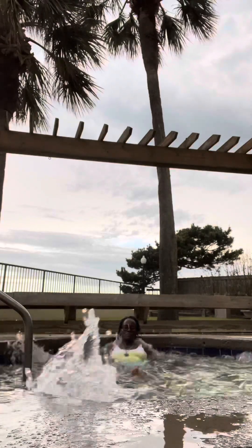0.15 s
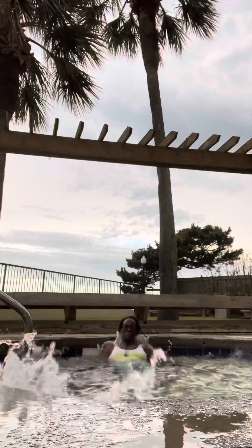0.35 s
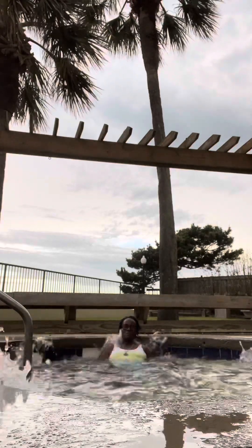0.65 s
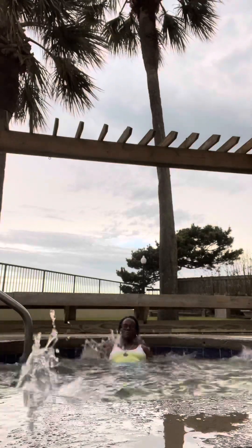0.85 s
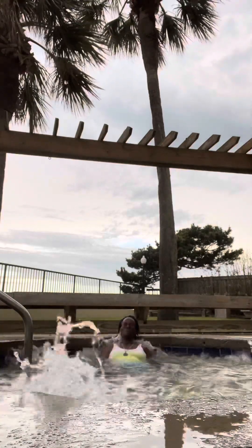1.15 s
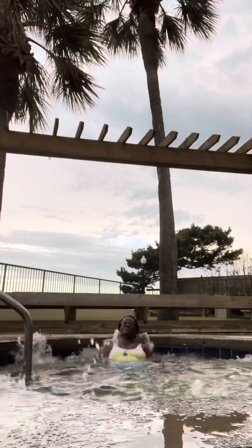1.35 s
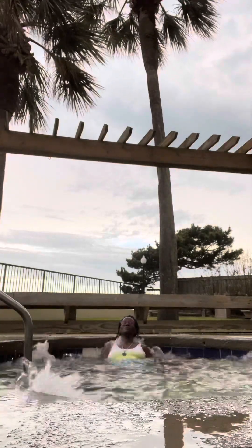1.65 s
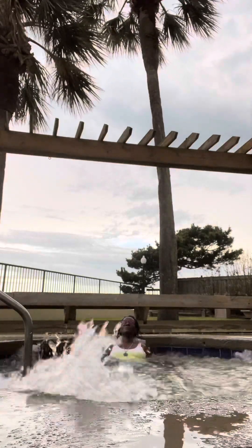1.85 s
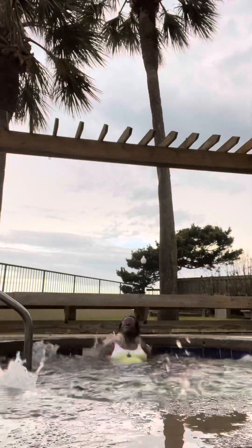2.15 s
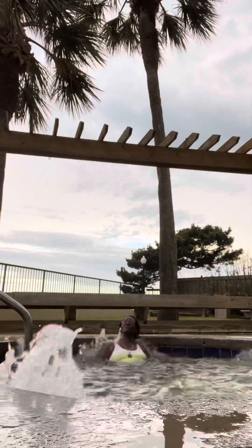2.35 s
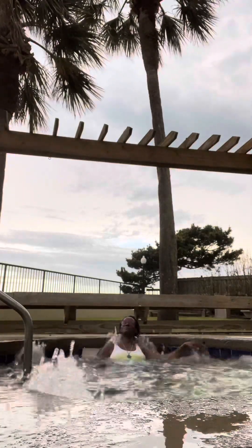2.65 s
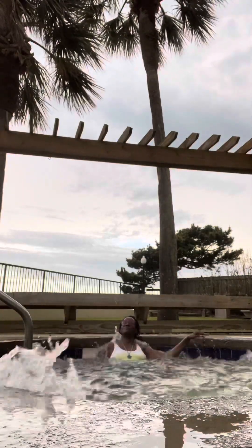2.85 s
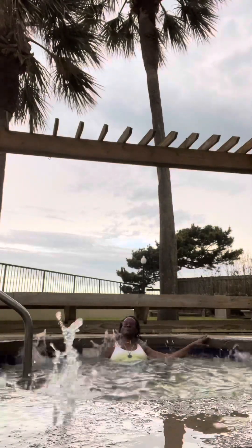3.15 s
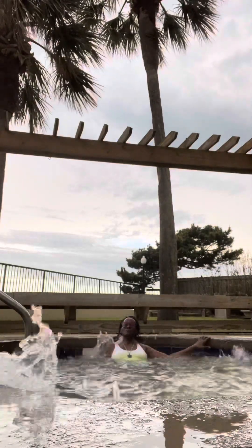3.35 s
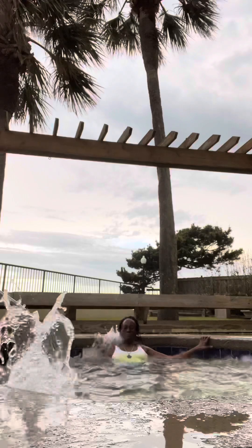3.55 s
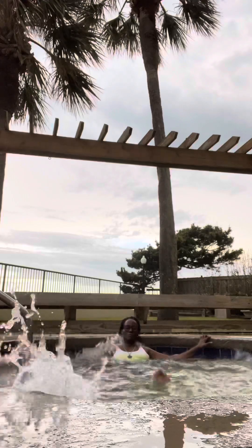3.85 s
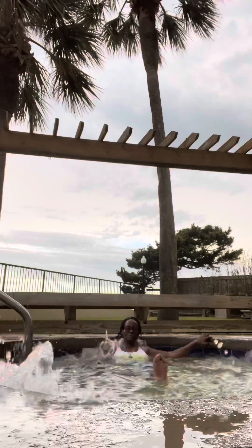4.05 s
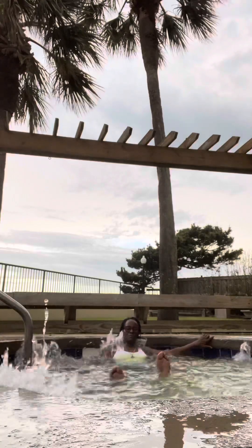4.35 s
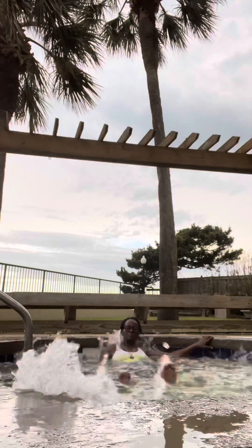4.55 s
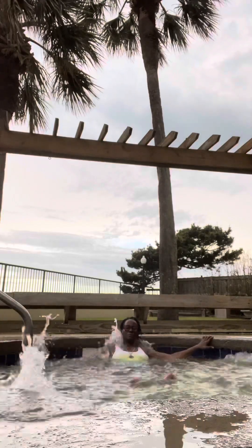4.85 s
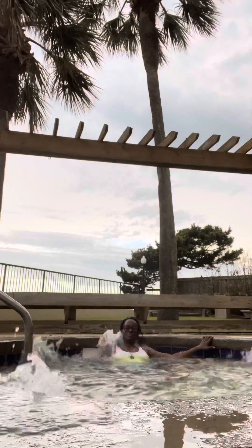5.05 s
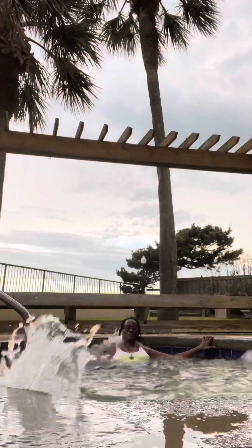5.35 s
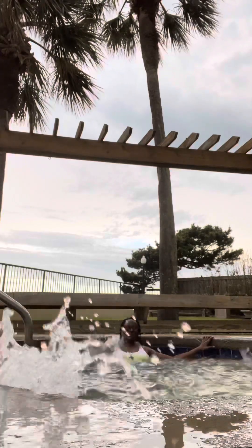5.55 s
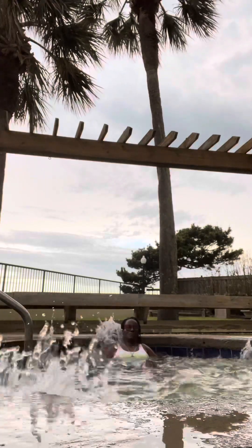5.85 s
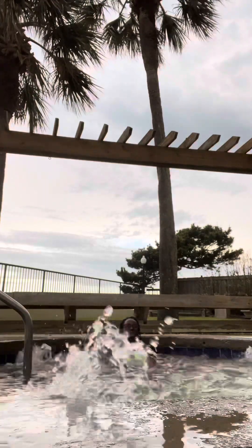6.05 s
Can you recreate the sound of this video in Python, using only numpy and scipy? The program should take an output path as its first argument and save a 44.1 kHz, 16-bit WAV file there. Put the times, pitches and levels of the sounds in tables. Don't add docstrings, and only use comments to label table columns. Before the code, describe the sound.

Hot tub jets churn and splash close by outdoors, with gurgling air pockets, bubbling froth, ticking drops and wind thumping softly on the microphone.

```python
import sys
import numpy as np
from scipy import signal
from scipy.io import wavfile
from scipy.ndimage import uniform_filter1d

SR = 44100
rng = np.random.default_rng(int(sys.argv[2]) if len(sys.argv) > 2 else 0)


def makeup_ratio(level_db):
    decades = np.asarray(level_db, float) / 20
    return 10 ** decades


def unload_wav(signal):
    wavfile.write(
        sys.argv[1],
        SR,
        np.round(np.clip(np.atleast_2d(signal).T, -1, 1) * 32767).astype(np.int16),
    )


N = 272979
FRAME, HOP = 1024, 256
WIND_HZ, SPRAY_HZ = 120, 950

# t/s, level/dB
JET_EFFORT = [
    (0.0, -29.5),
    (0.6, -31),
    (1.2, -28),
    (2.0, -25.5),
    (2.7, -22),
    (3.2, -24),
    (4.2, -26),
    (5.2, -24.5),
    (5.9, -26.5),
    (6.19, -23),
]
# t/s, lift/dB
HEAVES = [(0.2, 6), (0.4, 3.5), (0.62, 1), (1.0, -0.5), (1.42, 7.5), (1.82, 10.5), (2.1, 2.5), (2.3, 3),
          (2.5, 6.5), (2.78, 2.5), (3.1, 0), (3.4, 2.5), (3.6, 7.5), (3.8, 5.5), (4.13, 1.5), (4.4, 9),
          (4.66, 5.5), (5.0, 3), (5.3, 2.5), (5.7, 3.5), (6.0, 0)]
# t/s, lift/dB
SHEETS = [(0.0, 1.5), (0.2, 1.5), (0.5, 2), (0.78, 2), (1.08, 2.5), (1.42, 2), (2.12, 3.5), (2.52, 2.5),
          (2.8, 0.5), (3.05, 1.5), (3.87, 2.5), (4.2, 1.5), (4.68, 3.5), (4.92, 1), (5.2, 1.5), (5.4, 1),
          (5.7, 4.5), (6.0, 2.5)]
# t/s, half length/s, depth/dB (negative lifts), centre f/Hz
LULLS = [(0.408, 0.026, 6, 930), (0.831, 0.014, 14, 850), (0.848, 0.03, 5, 400), (0.94, 0.022, 16, 600),
         (1.045, 0.038, 9, 696), (1.224, 0.02, 14, 810), (3.66, 0.07, 8, 250), (5.46, 0.047, 16, 230),
         (2.45, 0.14, 11, 50), (2.98, 0.052, 22, 66), (3.993, .025, 7, 730), (4.538, 0.033, 16, 60),
         (5.866, 0.038, 19, 120), (0.68, .03, 2, 150), (0.885, 0.021, 4, 950), (1.02, 0.038, 2, 240),
         (1.155, 0.04, 0.5, 580), (1.34, 0.03, 4, 230), (1.817, 0.037, 12, 200), (2.2, 0.094, 3, 460),
         (2.306, 0.027, 2.5, 950), (3.54, 0.028, 17, 114), (3.895, .025, 2, 312), (4.39, 0.018, 9, 200),
         (5.948, .04, 6, 50), (6.16, 0.066, 6, 370), (5.406, 0.02, -2, 400), (5.698, .03, 4, 1700),
         (5.77, 0.018, 6, 70), (3.0, .03, 6, 45), (3.595, 0.036, 1.5, 430), (0.75, .02, 6, 120),
         (5.4, .012, 6, 380), (5.528, .012, 6, 420), (3.665, 0.11, 3.5, 630), (4.66, .04, 3, 210),
         (3.045, .02, 1.5, 680), (0.14, 0.025, -2, 390), (1.69, 0.051, 8, 170), (5.2, .03, 3, 330),
         (1.136, .03, 2, 630)]
# t/s, half length/s, depth/dB
THINNINGS = [(0.05, .08, 2), (0.55, 0.092, 4), (0.85, .1, 3), (1.06, 0.078, 3), (6, 0.13, 3), (6.3, .22, 7),
             (0.22, .04, 6), (0.34, .02, 4), (5.6, .05, 4), (4.3, 0.028, 10), (2.4, .04, 2), (1.48, .04, 4)]
# f/Hz, density/dB per Hz
SUM_SPECTRUM = [(18, -41), (30, -13.5), (65, -3.5), (189, -4.5), (335, -3), (500, -8), (552, -6),
                (674, -11), (1570, -18.5), (2460, -24.5), (4140, -28.5), (4810, -30), (7920, -32.5),
                (11500, -41.5), (15000, -90), (22000, -120)]
# f/Hz, density/dB per Hz
DIFF_SPECTRUM = [(60, -13), (100, -4), (200, -21), (500, -6), (960, -1), (2400, -8), (3000, -9),
                 (4000, -14), (4600, -10.5), (5700, -15), (6500, -20), (7500, -16.5), (13000, -15.5),
                 (15300, -17)]
# f/Hz, density/dB per Hz
WIDE_SPECTRUM = [(24, -49), (40, -18), (131, 1), (350, 3.5), (595, -6.5), (758, -15), (1500, -34),
                 (1950, -59), (3300, -120)]
# f/Hz, share in phase/1, share a quarter turn late/1
PORT_LINK = [(300, -0.02, 0.51), (1340, -0.4, -0.28), (1900, -0.077, 0), (2500, 0.057, -.4),
             (3100, 0.051, 0), (3900, 0.089, .65), (4500, 0.23, .5), (5000, 0.31, -.2), (5800, .1, 0),
             (6900, -0.0075, .6), (11500, 0, .65)]
# f/Hz, half width/Hz, level/dB
PORT_RESONANCE = (4190, 320, 3.8)
# f/Hz, level/dB
WALL_SHADE = (1780, -1.47)
# t/s, level/dB
GUARD_WIDTH = [(0.0, -25), (0.4, -23), (1.0, -19), (1.4, -21), (1.5, -34), (1.9, -40), (2.0, -46),
               (3.0, -48), (3.2, -23), (3.3, -44), (3.7, -28), (3.8, -33), (3.9, -20.5), (4.6, -26),
               (4.75, -37), (5.1, -33), (5.2, -29), (6.19, -24)]
# t/s, peak level/dB, f/Hz, length/s
GULPS = [(0.241, -10, 207, 0.082), (0.704, -9, 319, 0.048), (3.661, -14, 270, 0.046),
         (1.06, -10.5, 320, 0.042), (1.263, -6, 333, 0.025), (1.498, -7, 377, 0.03),
         (1.734, -7, 300, 0.039), (1.867, -6, 300, 0.047), (2.0, -12, 218, 0.018),
         (2.025, -6.5, 296, 0.055), (2.169, -12, 313, 0.057), (2.473, -6.5, 300, 0.037),
         (2.976, -8, 214, 0.035), (3.043, -7, 242, 0.062), (3.098, -3, 389, 0.036), (3.117, -13, 352, .025),
         (3.845, -5, 280, 0.017), (3.435, -12, 190, .02), (4.091, -8, 278, 0.038), (2.93, -9, 178, 0.046),
         (2.792, -6.5, 200, .03), (2.09, -9.5, 318, 0.026), (5.67, -10, 300, 0.024), (5.726, -10, 352, .02),
         (5.79, -15, 394, 0.045), (0.902, -9.5, 336, 0.025), (1.113, -11, 327, .025),
         (3.148, -4.5, 178, 0.023), (3.217, -14, 152, 0.059), (3.286, -5.5, 219.6, 0.081),
         (3.413, 0.5, 264, 0.015), (3.483, -0.5, 250, 0.023), (3.614, -7.5, 255, 0.031),
         (3.76, -7, 172, 0.036), (3.819, 2, 152, 0.026), (4.553, -12, 450, 0.018),
         (4.811, -3.5, 371, 0.031), (4.985, -5.5, 345, 0.031), (5.191, -9, 184, 0.046),
         (5.295, -5.5, 270, 0.026), (5.326, -5, 432, 0.037), (5.65, -9, 468, 0.024),
         (5.711, -9, 277, 0.034)]
# t/s, peak level/dB, f/Hz
BURBLES = [(0.128, -21, 312), (0.175, -18, 195), (0.36, -15, 354), (0.544, -19, 231), (0.664, -22, 270),
           (0.976, -15, 290), (1.073, -15, 171), (1.407, -14, 345), (1.556, -17, 260), (1.81, -22, 315),
           (1.959, -31, 252), (2.245, -16, 159), (2.3, -16, 280), (2.33, -11.5, 180), (2.4, -20, 355),
           (2.605, -26, 213), (2.655, -11.5, 218), (2.688, -15, 300), (2.758, -30, 338), (3.33, -11, 290),
           (3.996, -20, 325), (4.124, -21, 320), (4.2, -17, 217), (4.3, -19, 184), (4.408, -22, 310),
           (4.439, -12, 265), (4.616, -14, 326), (4.674, -18, 180), (4.718, -14, 330), (4.754, -14, 380),
           (2.885, -9.5, 198), (2.78, -17, 250), (4.94, -28, 310), (5.031, -19, 164), (5.147, -24, 382),
           (5.224, -13, 260), (5.353, -17, 322), (5.536, -22, 285), (5.573, -13, 273), (6.034, -21, 346)]
# t/s, peak level/dB, f/Hz
PLOPS = [(0.434, -17, 550), (0.901, -12.5, 532), (0.963, -25, 580), (1.118, -10.5, 530), (1.262, -12, 635),
         (1.319, -15, 574), (1.842, -16, 467), (2.07, -6.5, 407), (2.484, -19, 448), (2.719, -22, 441),
         (3.035, -16, 570), (3.096, -14, 423), (3.416, -15, 585), (3.535, -13, 605), (3.928, -11.5, 452),
         (4.196, -6, 437), (4.254, -11, 560), (4.43, -7.5, 416), (4.554, -17, 433), (5.031, -13, 520),
         (5.26, -14, 426), (5.364, -10.5, 540), (5.652, -9.5, 482), (6.044, -11.5, 590)]
# t/s, peak level/dB, f/Hz
BLIPS = [(0.584, -12, 474), (1.081, -16, 460), (1.197, -15.5, 523), (1.414, -20, 447), (1.663, -14, 564),
         (2.881, -20, 530), (3.825, -12, 450), (4.06, -15, 558), (4.321, -20, 510), (4.635, -18, 522),
         (2.775, -15, 490), (0.6, -19, 627), (0.72, -15, 540), (0.13, -18.5, 598), (5.103, -20, 614),
         (5.19, -26, 435), (5.74, -21, 497), (6.076, -17.5, 540), (6.128, -15.5, 551)]
# t/s, peak level/dB, f/Hz
POPS = [(0.11, -20, 660), (0.443, -19, 810), (0.583, -18, 807), (0.859, -20, 1040), (1.364, -20, 840),
        (1.5, -27, 660), (1.609, -17, 770), (1.683, -18, 1040), (1.789, -19, 805), (2.046, -21, 1160),
        (2.416, -22, 872), (2.771, -17, 850), (2.804, -20, 1377), (2.893, -26, 732), (2.972, -26, 800),
        (3.285, -28, 727), (3.417, -18, 690), (3.487, -19, 915), (3.814, -21, 806), (3.928, -24, 678),
        (4.305, -23, 630), (4.429, -22, 781), (4.505, -18, 902), (4.642, -21, 773), (4.702, -18, 1140),
        (5.049, -26, 890), (5.207, -21, 670), (5.357, -16, 794), (5.56, -15, 700), (5.604, -24, 851),
        (5.643, -15, 899), (5.786, -15, 746), (5.896, -16, 970), (6.071, -19, 750)]
# t/s, peak level/dB, f/Hz, length/s
PLINKS = [(0.291, -25, 2550, 0.016), (0.73, -30, 3220, 0.011), (1.021, -18.5, 4330, 0.008),
          (1.331, -24, 4100, 0.014), (1.63, -22, 4500, 0.0091), (2.267, -26, 3040, 0.013),
          (2.464, -25, 3000, 0.014), (2.553, -16.5, 2250, 0.034), (2.802, -29, 2110, 0.014),
          (3.011, -24, 3300, 0.013), (3.231, -22, 3570, 0.014), (3.668, -22, 4220, 0.02),
          (3.737, -18, 3480, 0.019), (3.831, -18, 2200, 0.04), (5.453, -26, 4200, .015),
          (4.04, -29, 4070, .012), (4.155, -18, 3170, 0.015), (5.364, -21, 4020, 0.012),
          (5.881, -22, 2630, 0.014)]
# t/s, peak level/dB, ring f/Hz
DROPS = [(0.049, -24, 6120), (0.297, -15, 7000), (0.45, -19, 6100), (0.87, -19, 6810), (1.022, -21, 4400),
         (1.49, -18, 5800), (1.632, -23, 5460), (1.9949, -22, 6090), (2.177, -14.5, 6000),
         (2.2689, -16.5, 6150), (2.4244, -25, 6960), (2.4688, -21, 7030), (2.611, -21, 6140),
         (2.646, -15.5, 5500), (2.7072, -28, 5250), (3.2166, -22, 6320), (3.671, -20, 5310),
         (4.62, -15, 7100), (4.6254, -18, 6000), (5.3652, -22, 6450), (5.4415, -23, 7040),
         (5.463, -20, 7000), (6.1519, -31, 4860)]
# t/s, peak level/dB, length/s, lowest f/Hz, highest f/Hz
TOP_HISSES = [
    (0.288, -43, 0.02, 11300, 15700),
    (3.752, -36, 0.015, 15100, 15800),
    (4.618, -30, .004, 14000, 16800),
    (4.623, -36, .004, 11300, 14000),
    (5.44, -39, .027, 11000, 15700),
    (5.461, -35, .005, 14500, 15800),
    (2.66, -37, .015, 11500, 12200),
]
# t/s, peak level/dB, f/Hz, length/s
THUMPS = [(0.24, -11.5, 83, 0.028), (0.4, -23, 92, 0.082), (0.804, -10.5, 94, 0.044),
          (4.463, -18, 96, 0.027), (0.902, -19, 118, 0.035), (1.25, -11.5, 135, 0.02),
          (1.472, -25, 104, 0.041), (1.87, -24, 57, 0.047), (2.306, -16.5, 126, 0.084),
          (2.415, -16, 136, .04), (2.619, -14.5, 128, 0.065), (3.062, -20.5, 105, 0.13),
          (3.234, -12, 120, 0.041), (3.289, -16, 124, 0.051), (3.368, -4, 104, 0.021),
          (3.334, -15, 70, 0.055), (3.427, -13, 99, 0.079), (3.468, -11, 100, 0.047), (3.6, -13, 67, 0.058),
          (3.695, -10.5, 69.4, 0.044), (3.769, -13.5, 133, 0.052), (3.821, -3, 69, 0.061),
          (3.875, -7.5, 67, 0.052), (4.31, -17, 127, 0.034), (4.427, -13.5, 83, 0.043),
          (0.051, -23, 121, 0.039), (1.327, -28, 113, .03), (5.918, -17, 134, 0.033),
          (4.595, -16, 68, 0.077), (5.005, -19.5, 76.6, 0.066), (5.149, -21, 107, 0.22),
          (5.686, -15, 100, 0.037), (3.34, -12, 151, 0.028), (5.75, -15, 110, 0.018),
          (6.084, -19.5, 98, 0.035)]
# t/s, level/dB
WIND = [(0.0, -33.5), (1.12, -39), (1.31, -28.5), (1.6, -39.5), (2.45, -32.5), (2.83, -39), (3.09, -28),
        (3.26, -37), (3.45, -20.5), (3.85, -29), (4.05, -35), (4.55, -30), (4.74, -39.5), (5.1, -39),
        (5.38, -41), (5.81, -29), (6.02, -32.5), (6.19, -46)]


def evened(x):
    return x / np.sqrt(np.mean(np.abs(x) ** 2) + 1e-20)


def drift(size):
    return evened(uniform_filter1d(uniform_filter1d(rng.standard_normal(N), size), size))


def blotches(x, bins, frames):
    return evened(uniform_filter1d(uniform_filter1d(x, bins, axis=0), frames, axis=1))


def read(points, hz, axis=1):
    table = np.transpose(points)
    return np.interp(np.log(hz + 1), np.log(table[0] + 1), table[axis])[:, None]


def follow(points, t):
    return np.interp(t, *np.transpose(points))


def add(mix, s, sound):
    part = mix[max(round(s * SR), 0):][:len(sound)]
    part += sound[:len(part)]


def lowpass(x, order, hz):
    return signal.sosfilt(signal.butter(order, hz, fs=SR, output="sos"), x)


def spectra(x):
    return signal.stft(x, nperseg=FRAME, noverlap=FRAME - HOP)[2]


def heard(z):
    return signal.istft(z, nperseg=FRAME, noverlap=FRAME - HOP)[1][:N]


def water():
    hz = np.fft.rfftfreq(FRAME, 1 / SR)[:, None]
    low = 1 / (1 + (hz / WIND_HZ) ** 4)
    high = 1 / (1 + (SPRAY_HZ / (hz + 1)) ** 3)
    gain = landings()
    near, far = surface(gain, high), surface(gain, high)
    t = np.arange(near.shape[1]) * HOP / SR
    guard_db = follow(GUARD_WIDTH, t)
    unfolded = np.minimum(makeup_ratio(guard_db), 1.5)

    field = rng.standard_normal(near.shape)
    pockets = blotches(field[:, ::-1], 2, 9)
    patches_db = 0.75 * blotches(field, 8, 8)
    patches_db = patches_db * (1 + (2.2 * unfolded + 1.1) * (1 - high))

    motion_db, splash_db = surges(t, hz, low, high)
    colour_db = port_colour(hz, patches_db) - lulls(t, hz)
    colour_db = colour_db + (1.4 + 6.1 * unfolded / (1 + (hz / 1300) ** 4)) * (1 - low) * pockets
    thin_db = sum(db * np.exp(-((t - s) / half_s) ** 2) for s, half_s, db in THINNINGS)

    total = near * makeup_ratio(read(SUM_SPECTRUM, hz[:, 0]) + colour_db + motion_db + patches_db)
    total = total * makeup_ratio((-6.0 * unfolded - 1.3 * thin_db) / (1 + (10600 / (hz + 1)) ** 30))

    link = read(PORT_LINK, hz[:, 0]) - 1j * read(PORT_LINK, hz[:, 0], axis=2)
    echo = link * near + np.sqrt(1 - np.clip(abs(link) ** 2, 0, 1)) * far
    top_loss_db = 2.4 * thin_db * (1 + 0.6 * pockets) / (1 + (14500 / (hz + 1)) ** 16)
    folded_db = read(DIFF_SPECTRUM, hz[:, 0]) + 0.9 * high * splash_db + patches_db - top_loss_db
    folded = echo * makeup_ratio(folded_db)

    wide = evened(heard(echo * makeup_ratio(read(WIDE_SPECTRUM, hz[:, 0]) + 2.5 * patches_db)))
    flutter_db = 3 * drift(1800)
    wide = wide * makeup_ratio(-3 + flutter_db + follow(GUARD_WIDTH, np.arange(N) / SR))

    total = evened(heard(total * (hz < 11700)))
    folded = evened(heard(folded * (hz < 15720)))
    return makeup_ratio(-24) * total, makeup_ratio(-37) * folded + wide


def surges(t, hz, low, high):
    churn_db = follow(JET_EFFORT, t) + swells(t, HEAVES, half_s=0.081)
    splash_db = swells(t, SHEETS, half_s=0.11)
    churn_db = churn_db - churn_db.mean()
    splash_db = splash_db - splash_db.mean()
    slosh_db = -churn_db
    wind_db = follow(WIND, t) + 36
    body = (1 - low) / (1 + (hz / 600) ** 3)
    rest = 1 - low - body - high
    return low * wind_db + body * churn_db + rest * slosh_db + high * splash_db, splash_db


def swells(t, rows, half_s):
    return sum(db * np.exp(-((t - s) / half_s) ** 2) for s, db in rows)


def port_colour(hz, patches_db):
    port_hz, width_hz, port_db = PORT_RESONANCE
    shade_hz, shade_db = WALL_SHADE
    waver = 1 + 0.18 * evened(uniform_filter1d(patches_db.mean(0), size=6))
    port = port_db * np.exp(-((hz - port_hz) / width_hz) ** 4) * waver
    return port + shade_db / (1 + (shade_hz / (hz + 1)) ** 24) / (1 + (hz / 2700) ** 8)


def lulls(t, hz):
    return sum(db * np.exp(-((t - s) / half_s) ** 2 - (np.log((hz + 1) / centre_hz) / 0.5) ** 2)
               for s, half_s, db, centre_hz in LULLS)


def surface(gain, high):
    gurgle = spectra(froth(45.27, 2532, per_s=2200, spread_db=1.5, turns=8.78, rise=0.17, hiss=0.75))
    fizz = spectra(gain * froth(1210, 15670, per_s=5000, spread_db=3.5, turns=8.3, rise=0.15, hiss=0.81))
    gurgle, fizz = flattened(gurgle), flattened(fizz)
    return np.sqrt(1 - high) * gurgle + np.sqrt(high) * fizz


def flattened(z):
    return z / np.sqrt(uniform_filter1d((abs(z) ** 2).mean(1), size=3))[:, None]


def landings():
    sheets, clumps = drift(900), drift(250)
    return makeup_ratio(0.85 * sheets + 0.77 * np.maximum(clumps, 0) ** 1.48)


def froth(lo_hz, hi_hz, per_s, spread_db, turns, rise, hiss):
    sizes = makeup_ratio(spread_db * np.minimum(rng.exponential(1, N), 4.5)) * rng.choice([-1, 1], N)
    bursts = sizes * (rng.random(N) < per_s / SR)
    kind, out = rng.integers(0, 24, N), np.zeros(N)
    for k, hz in enumerate(np.geomspace(lo_hz, hi_hz, 24)):
        grain = bubble(hz, turns / hz, rise)
        grain = grain / np.linalg.norm(grain) * np.sqrt(hz)
        out += signal.oaconvolve(bursts * (kind == k), grain)[:N]
    return np.sqrt(hiss) * rng.standard_normal(N) + np.sqrt(1 - hiss) * evened(out)


def bubble(hz, length_s, rise, onset=0.22):
    u = np.linspace(0, 1, int(2 * length_s * SR) + 8)
    shape = (1 - np.exp(-u / (0.25 * onset))) * np.exp(-3.5 * u) * (1 - u)
    phase = 2 * np.pi * np.cumsum(hz * (1 + rise * (2 * u - 0.4))) / SR
    return shape / shape.max() * np.sin(phase)


def gulps():
    out = np.zeros(N)
    for s, db, hz, length_s in GULPS:
        add(out, s - 0.003, makeup_ratio(db - 11.0) * bubble(hz, 0.89 * length_s, 0.16, onset=0.31))
    # rows, trim/dB, turns, rise, onset, lead/s
    for rows, trim_db, turns, rise, onset, lead_s in (
            (BURBLES, -6, 6.4, 0.13, 0.89, 0.003), (PLOPS, -10.5, 11.8, 0.068, 0.33, 0.002),
            (BLIPS, -8, 11.8, 0.11, 0.4, 0.002), (POPS, -7, 9.3, 0.08, 0.39, 0.002)):
        for s, db, hz in rows:
            add(out, s - lead_s, makeup_ratio(db + trim_db) * bubble(hz, turns / hz, rise, onset))
    return out


def plinks():
    out = np.zeros(N)
    for (s, db, hz, length_s), mates in zip(PLINKS, rng.uniform(-1, 1, (len(PLINKS), 9, 2))):
        spread = 0.071 * min(0.016 / length_s, 1)
        for pitch, late in mates:
            ring = bubble(hz * (1 + spread * pitch), 13.8 / hz, 0.042)
            add(out, s + 0.44 * length_s * (late + 0.71), makeup_ratio(db - 15.5) * ring)
    return out


def drops():
    tick, t = np.zeros(N), np.arange(400) / SR
    for (s, db, hz), noise in zip(DROPS, rng.standard_normal((len(DROPS), 400))):
        crack = 0.5 * np.diff(noise, prepend=0) * np.exp(-t / 0.0055)
        ring = 1.8 * np.sin(2 * np.pi * hz * t) * np.exp(-t / 0.00035)
        add(tick, s, makeup_ratio(db - 6.5) * (crack + ring))
    apart = lowpass(np.diff(tick, prepend=0), 14, 13500)
    return lowpass(tick, 8, 10000), makeup_ratio(-8) * apart


def top_hisses():
    out = np.zeros(N)
    for (s, db, length_s, lo_hz, hi_hz), noise in zip(TOP_HISSES, rng.standard_normal((len(TOP_HISSES), 1400))):
        size = int(length_s * SR)
        puff = np.zeros(1400)
        puff[:size] = np.hanning(size)
        band = signal.butter(7, [lo_hz, hi_hz], "band", fs=SR, output="sos")
        add(out, s, makeup_ratio(db) * signal.sosfilt(band, puff * noise))
    return out


def thumps():
    out = np.zeros(N)
    for s, db, hz, length_s in THUMPS:
        t = np.arange(int(length_s * SR)) / SR
        rocking = np.sin(np.pi * (t / length_s) ** 0.41) * np.sin(2 * np.pi * hz * t)
        push = 0.2 * bubble(313, 0.0031, -0.62)
        add(out, s - 0.004, makeup_ratio(db - 5.5) * rocking)
        add(out, s, makeup_ratio(db + 4.5) * push)
    return out


def scene():
    total, difference = water()
    tick, tick_apart = drops()
    top_hiss = top_hisses()
    blows = lowpass(gulps() + plinks() + thumps() + tick, 10, 9500)
    total = total + blows + top_hiss
    difference = difference + tick_apart + 0.4 * top_hiss
    return np.array([total + difference, total - difference])


def low_pass(x):
    return signal.sosfilt(signal.butter(12, 16990, fs=SR, output="sos"), x)


def record(dry):
    mix = signal.lfilter(*signal.butter(2, 30, "high", fs=SR), dry)
    return low_pass(mix)


dry = scene()
out = record(dry)
unload_wav(out)
```